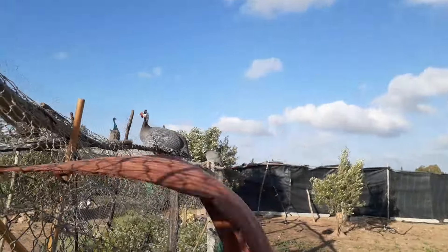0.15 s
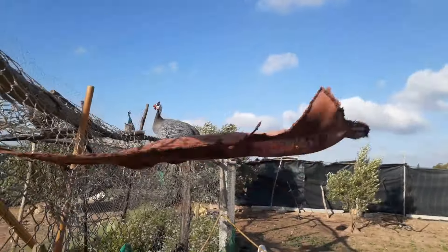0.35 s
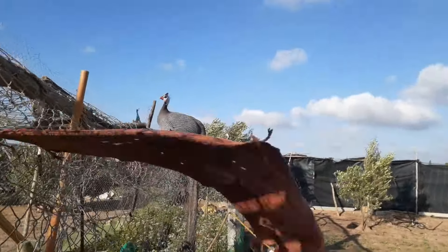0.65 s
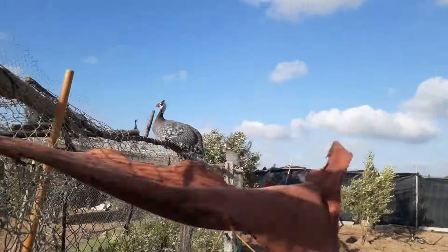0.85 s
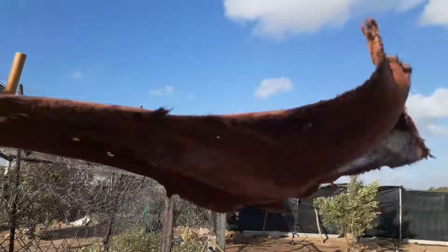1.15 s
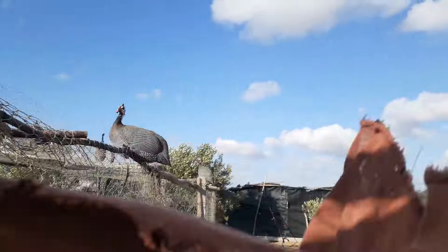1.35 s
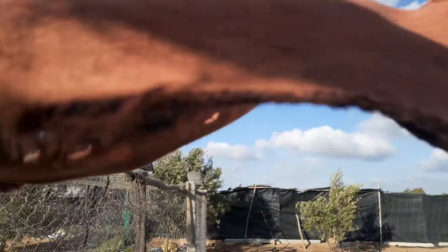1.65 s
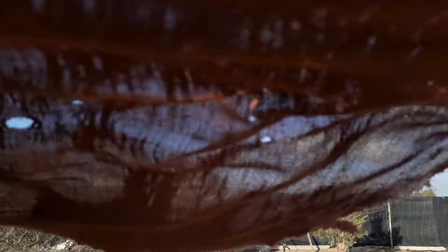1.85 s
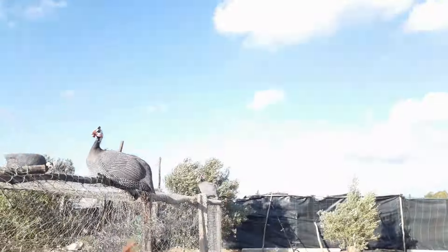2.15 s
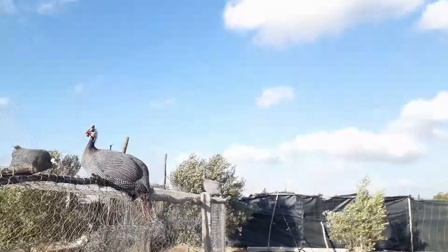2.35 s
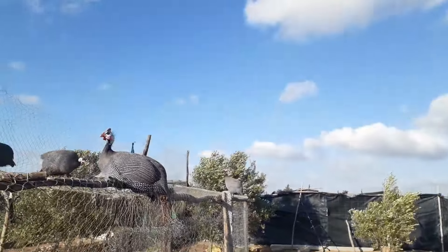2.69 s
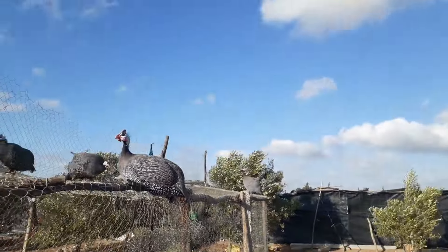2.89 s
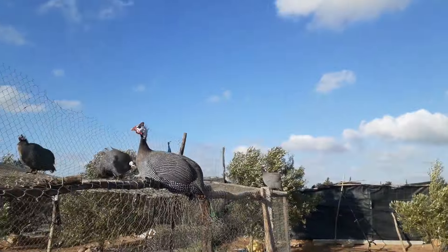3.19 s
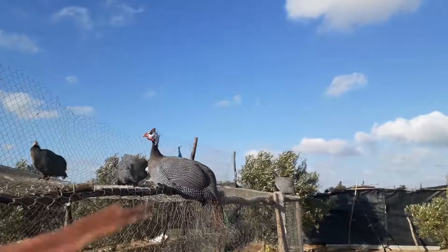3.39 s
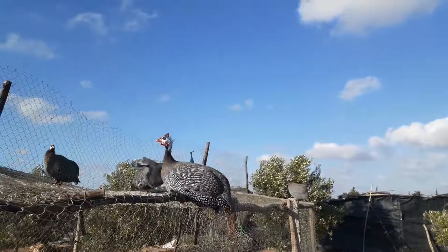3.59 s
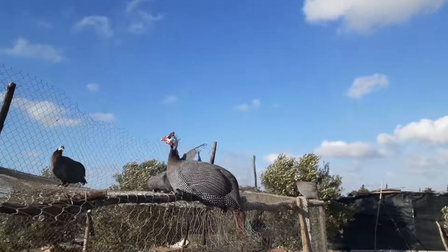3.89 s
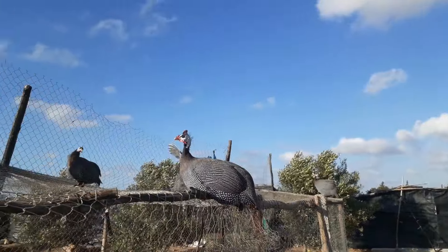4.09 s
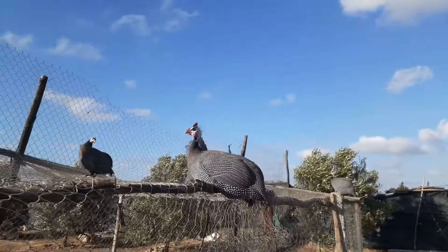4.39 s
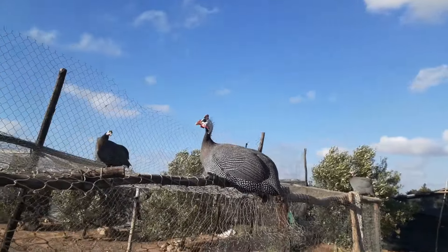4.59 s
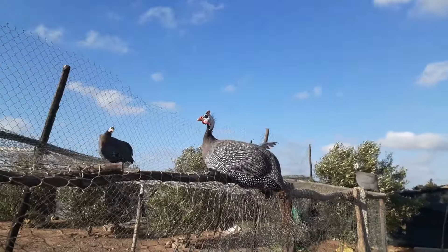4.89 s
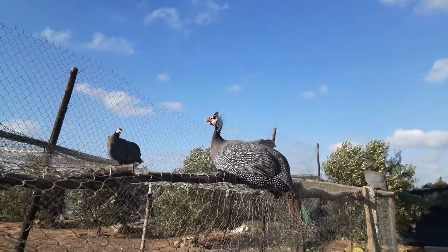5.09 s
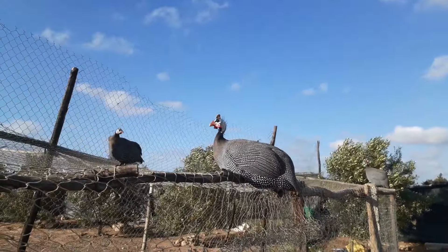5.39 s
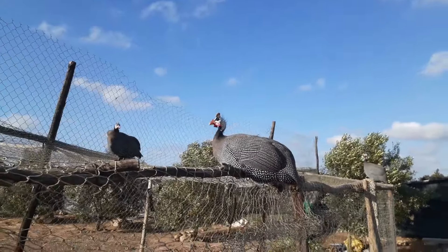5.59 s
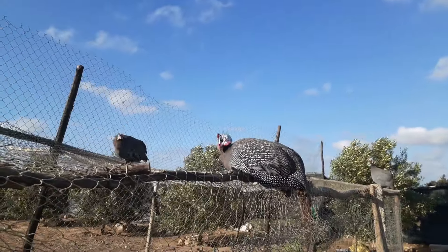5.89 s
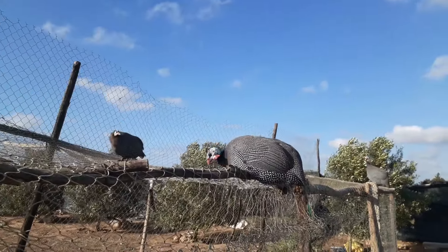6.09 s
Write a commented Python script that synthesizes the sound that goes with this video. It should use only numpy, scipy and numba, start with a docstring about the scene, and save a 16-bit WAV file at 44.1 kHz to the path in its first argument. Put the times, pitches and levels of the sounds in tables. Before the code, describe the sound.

Wind buffets the microphone in uneven gusts and soft thumps while two guineafowl call outdoors by a fence. The closer one repeats short, grating notes several times a second, and the other interjects from the other side. About two seconds in comes a smoother, falling cry, followed by a brief rattle. The harsh notes then resume, mostly shorter and mixed with hoarse squeaks, with slight reflections from the yard.

```python
"""A farm yard: guineafowl on the fence run off fast, harsh notes, a near bird with a second cutting in.
The second gives one long falling cry, then the near one breaks into a rattle. Each note is a buzz of
syrinx pulses through a narrow, sinking throat resonance and a rasping beak resonance; some crack into
a squeak. The yard answers faintly, and gusty wind buffets and thumps both microphone ports."""
import sys
import numpy as np
from scipy import signal
from scipy.fft import rfft, irfft, next_fast_len
from scipy.io import wavfile
from scipy.ndimage import uniform_filter1d, map_coordinates
from numba import njit

SR = 44100
rng = np.random.default_rng(int(sys.argv[2]) if len(sys.argv) > 2 else 0)


def store_wav(level_fs):
    """Save 16-bit WAV to argv[1]."""
    pcm = np.round(np.clip(np.atleast_2d(level_fs), -1, 1) * 32767)
    wavfile.write(sys.argv[1], SR, pcm.T.astype(np.int16))


N = 275625


def amp(db):
    """Decibels to gain."""
    return 10 ** (np.asarray(db) / 20)


def unit(x):
    """Scale to rms 1."""
    return x / np.sqrt(np.mean(x ** 2) + 1e-20)


def steady(x, window_samples=1100):
    """Scale to a running rms of 1."""
    return x / np.sqrt(np.abs(uniform_filter1d(x ** 2, window_samples)) + 1e-12)


def at_hz(points, hz):
    """Interpolate (frequency, value) points on a log frequency axis."""
    knots_hz, values = np.transpose(points)
    return np.interp(np.log(hz + 1), np.log(knots_hz + 1), values)


def wobble(rate_hz, samples=N):
    """Smooth random curve, rate_hz knots a second."""
    knots = rng.standard_normal(int(samples * rate_hz / SR) + 4)
    return map_coordinates(knots, [np.arange(samples) * rate_hz / SR])


def filtered(x, response):
    """Apply a complex frequency response."""
    size = next_fast_len(x.shape[-1] + 4096)
    hz = np.fft.rfftfreq(size, 1 / SR)
    return irfft(rfft(x, size) * response(hz), size)[..., :x.shape[-1]]


def coloured(x, spectrum):
    """Apply (frequency [Hz], gain [dB]) points."""
    return filtered(x, lambda hz: amp(at_hz(spectrum, hz)))


@njit
def resonate(x, hz, width_hz):
    """Resonator with a moving centre."""
    y, state = np.zeros(len(x)), 0j
    for i in range(len(x)):
        state = state * np.exp((-np.pi * width_hz + 2j * np.pi * hz[i]) / SR) + x[i]
        y[i] = state.real
    return y


def impulses(positions, sizes, samples):
    """Band-limited clicks at fractional sample positions."""
    taps = np.floor(positions)[:, None] + np.arange(-7, 9)
    offset = taps - positions[:, None]
    clicks = sizes[:, None] * np.sinc(offset) * np.cos(np.pi * offset / 16) ** 2
    return np.bincount(np.clip(taps, 0, samples - 1).astype(int).ravel(), clicks.ravel(), samples)


def turbulence(spectrum, lump_rate_hz, lump_db):
    """Noise in lumps that differ from port to port, running rms 1."""
    lumps = amp(lump_db * np.array([wobble(lump_rate_hz), wobble(lump_rate_hz)]))
    return steady(coloured(lumps * rng.standard_normal((2, N)), spectrum), window_samples=4400)


# Gust strength (time [s], rumble level [dB], flutter level [dB])
GUSTS = [(0.0, -34, -28), (0.09, -33, -33), (0.12, -27, -22.5), (0.24, -29, -34), (0.29, -32.5, -28),
         (0.35, -36.5, -43), (0.56, -37, -38), (0.57, -41, -23), (0.62, -31, -32.5), (0.87, -28, -28),
         (1.22, -31.5, -28), (1.27, -49, -35), (1.34, -34, -28.5), (1.38, -34, -43), (1.44, -31, -27),
         (1.88, -32.5, -35), (3.25, -32.5, -36.5), (3.43, -63, -60.5), (3.67, -29.5, -31.5),
         (4.02, -44, -52.5), (4.05, -35.5, -37), (4.63, -31, -35), (4.77, -34, -40.5), (5.29, -24, -36),
         (5.33, -27.5, -32), (5.54, -36.5, -41), (5.61, -26.5, -33), (5.79, -33.5, -46),
         (5.94, -31.5, -37.5), (6.25, -35.5, -38.5)]
# Wind and open-air spectra (frequency [Hz], gain [dB])
RUMBLE_SPECTRUM = [(10, -44), (25, -57), (40, -23), (70, -3.5), (150, 2.5), (300, -1), (500, -8.5),
                   (900, -50.5)]
FLUTTER_SPECTRUM = [(150, -4), (350, -1), (600, 0.5), (850, -4.5), (1200, -1.5), (1600, -10.5),
                    (2200, -23.5), (3500, -29), (8000, -46), (16000, -81)]
TEARING_SPECTRUM = [(300, -36), (600, -5.5), (850, 6.5), (1100, -10.5), (1600, -43), (4000, -54)]
AIR_SPECTRUM = [(30, 10), (150, 10), (400, -2), (1000, -21), (3000, -10), (7000, -37), (16000, -55)]


def wind():
    """Gusts rumble and flutter on the ports over quiet air; hard ones tear at a higher pitch."""
    t = np.arange(N) / SR
    time_s, *levels_db = np.transpose(GUSTS)
    rumble_db, flutter_db = (np.interp(t, time_s, db) for db in levels_db)
    swirl_db = 1.63 * np.array([wobble(rate_hz=14), wobble(rate_hz=14)])  # one per port
    hard_gust_db = -29
    tearing_db = hard_gust_db - 4 + 2.08 * (flutter_db + swirl_db - hard_gust_db)
    rumble = amp(rumble_db + 1.5 + swirl_db) * turbulence(RUMBLE_SPECTRUM, lump_rate_hz=49, lump_db=7.5)
    flutter = turbulence(FLUTTER_SPECTRUM, lump_rate_hz=110, lump_db=7)
    flutter *= amp(flutter_db + 4 + 1.85 * swirl_db)
    tearing = amp(tearing_db) * turbulence(TEARING_SPECTRUM, lump_rate_hz=110, lump_db=4.5)
    air = amp(-79) * unit(coloured(rng.standard_normal((2, N)), AIR_SPECTRUM))
    return rumble + flutter + tearing + air


# Squeaks (time [s], length [s], start pitch [Hz], level [dB])
SQUEAK_NOTES = [(0.058, 0.023, 1445, -32.5), (0.262, 0.021, 1355, -33.5), (0.293, 0.0079, 1356, -27),
                (0.921, 0.018, 1345, -29), (0.948, 0.0081, 1314, -19.5), (1.127, 0.0099, 1570, -29),
                (1.264, 0.0093, 1540, -29), (1.298, 0.0058, 1360, -24.5), (1.449, 0.017, 1540, -32),
                (1.632, 0.017, 1424, -27), (1.66, .02, 1460, -30), (2.145, 0.019, 2310, -30),
                (2.234, .025, 1405, -25), (2.333, 0.024, 2370, -29), (2.455, 0.019, 1325, -30),
                (2.477, 0.01, 1303, -18.5), (2.606, 0.017, 1400, -35), (4.373, 0.041, 1488, -25),
                (4.588, 0.014, 1517, -23), (5.292, 0.068, 1630, -26.5), (5.804, 0.046, 1456, -32.5),
                (6.151, 0.027, 1460, -27)]
# Weighting of their harmonics (frequency [Hz], gain [dB])
SQUEAK_SPECTRUM = [(1400, -5), (1520, -51), (1620, 5), (2000, -20), (2850, 14), (3250, -1), (4050, 10),
                   (4700, -5.5), (5400, 5), (6200, -8.5), (8000, -24.5), (11000, -15), (15000, -50)]


def squeaks():
    """The syrinx slips into short, hoarse whistles, all gliding towards one resting pitch."""
    rest_hz, glide_s = 1578, 0.048
    out = np.zeros(N + SR)
    waver = 1 + 0.021 * wobble(rate_hz=600)
    hoarseness = amp(3.4 * wobble(rate_hz=500))
    for time_s, length_s, start_hz, db in SQUEAK_NOTES:
        progress = np.linspace(0, 1, int(length_s * SR))
        start = round(time_s * SR)
        span = slice(start, start + len(progress))
        hz = (rest_hz + (start_hz - rest_hz) * np.exp(-progress * length_s / glide_s)) * waver[span]
        phase = 2 * np.pi * np.cumsum(hz) / SR
        tone = sum(amp(at_hz(SQUEAK_SPECTRUM, k * hz)) * np.sin(k * phase) for k in range(1, 9))
        envelope = np.sqrt(np.abs(np.sin(np.pi * progress ** (2 / 3))))
        out[span] += amp(db) * unit(tone * hoarseness[span] * envelope)
    return out[:N]


# Port mismatch (frequency [Hz], left minus right [dB])
PORT_BALANCE = [(2100, 0), (4500, -4.5), (7000, -0.5), (12000, 2)]
# Yard reverberation (frequency [Hz], T60 [s])
YARD_DECAY = [(300, 0.45), (2000, 0.34), (4600, 0.39), (7000, 0.36), (14000, 0.41)]
# Echo colour (frequency [Hz], gain [dB])
ECHO_SPECTRUM = [(2000, 2), (4600, -1.5), (7000, -1.5), (14000, 5)]


def yard(x, left_lead_s, pan_db, walls_db, tail_db):
    """Direct sound at both ports, plus echoes and a diffuse tail off fence, ground and sheds."""
    def ports(hz):
        side = np.array([[1], [-1]])
        gain = amp(side * (pan_db + at_hz(PORT_BALANCE, hz)) / 2)
        return gain * np.exp(1j * np.pi * hz * left_lead_s * side)

    samples = SR // 2
    walls = np.zeros((2, samples))
    for channel in walls:
        signs = rng.choice([-1, 1], size=10)
        delays_s = rng.uniform(0.002, 0.02, size=10)
        channel[(delays_s * SR).astype(int)] = signs
    hz, t, noise = signal.stft(rng.standard_normal((2, samples)), SR, nperseg=256)
    decay = amp(-60 * t / at_hz(YARD_DECAY, hz)[:, None])
    tail = signal.istft(noise * decay, SR, nperseg=256)[1][:, :samples]
    response = amp(walls_db) * walls / np.linalg.norm(walls[0])
    response += amp(tail_db) * tail / np.linalg.norm(tail[0])
    echoes = signal.fftconvolve(coloured(x, ECHO_SPECTRUM)[None], response, axes=1)[:, :N]
    return filtered(x, ports) + echoes


def syrinx(pulse_hz, flutter_phase, roughness):
    """Pulses, pulled early and late by the slower flutter, with a puff of air in each."""
    n = np.arange(len(pulse_hz))
    cycles = np.cumsum(pulse_hz) / SR
    positions = np.interp(np.arange(1, int(cycles[-1]) + 1), cycles, n)
    slip, scatter = rng.standard_normal((len(positions), 2)).T
    jitter_s = 80e-6 * roughness * slip + 35e-6 * np.sin(np.interp(positions, n, flutter_phase))
    pulses = impulses(positions + SR * jitter_s, amp(4 * roughness * scatter), len(n))
    puffs = rng.standard_normal(len(n)) * np.exp(0.49 * np.cos(2 * np.pi * cycles))
    return unit(pulses) + 3.47 * roughness * unit(puffs)


# Overtones that move with the beak resonance (multiple [ratio], width [Hz], level [dB])
BEAK_MODES = [(1.47, 700, -17.5), (2.45, 1310, -27)]
# Rasp treble by note onset (time [s], gain [dB])
RASP_TREBLE = [(0.6, -9.5), (0.75, -1), (1.0, -0.5), (2.3, -2.5), (2.8, 9.5), (3.2, -1), (3.9, -1),
               (4.2, -2), (4.68, 10.5), (4.82, -2), (5.4, 1.5), (5.9, -6)]
# Share of that gain applied (frequency [Hz], share [0-1])
TREBLE_SHARE = [(6500, 0), (10000, 1)]


def beak_rasp(source, time_s, centre_hz, nominal_hz, width_hz, spectrum, upper_db):
    """Pulses ring the moving beak modes and fixed upper resonances whose levels vary by note."""
    treble_db = np.interp(time_s, *np.transpose(RASP_TREBLE))
    modes = 0
    for multiple, mode_width_hz, db in [(0.98, width_hz, 0), *BEAK_MODES]:
        ring = resonate(source, multiple * centre_hz, mode_width_hz)
        ring = resonate(ring, multiple * centre_hz, mode_width_hz)
        modes += amp(db + treble_db * at_hz(TREBLE_SHARE, multiple * nominal_hz)) * unit(ring)
    hz, gain_db = np.transpose(spectrum)
    colour_db = treble_db * at_hz(TREBLE_SHARE, hz) + 2.5 * rng.standard_normal(len(hz))
    upper = coloured(source, np.column_stack([hz, gain_db + colour_db]))
    return steady(unit(modes) + amp(upper_db) * unit(upper), window_samples=2200)


# Fixed colour of the honk (frequency [Hz], gain [dB])
CHEST_SPECTRUM = [(300, -45), (1000, -22), (1450, -4), (2100, 0), (2900, -6), (3500, -11), (5000, -35),
                  (9000, -70)]


def guineafowl(notes, beak_spectrum, roughness_curve, *, throat_width_hz, beak_hz, beak_width_hz,
               chest_db, upper_db, flutter_hz, flutter_drift, flutter_depth,
               rise_s, fade_db, sink_hz_per_s, sink_s, pitch_follow):
    """The syrinx rings the throat (honk) and, chopped by its flutter, the beak (rasp)."""
    build_s, hold_s, max_fade_s, close_s = 0.01598, 0.026, 0.064, 0.028
    beak_hz_per_db = 17  # a harder rasp opens the beak wider
    out = np.zeros(N + SR)
    for time_s, length_s, db, rasp_db, pulse_hz, throat_hz in notes:
        t = np.arange(int(length_s * SR)) / SR
        roughness = at_hz(roughness_curve, pulse_hz)
        # Pitch and rasp sag while pressure builds and as it runs out.
        building = np.exp(-t / build_s)
        spent = np.clip(1 - (length_s - t) / min(0.554 * length_s, max_fade_s), 0, 1)
        sag = 0.07527 * (building + 1.125 * spent ** 1.178)
        sunk_hz = sink_hz_per_s * np.maximum(t - max(hold_s, length_s - sink_s), 0)

        drifting_hz = flutter_hz * (1 + flutter_drift * wobble(41.2, len(t)))
        flutter_phase = 2 * np.pi * np.cumsum(drifting_hz) / SR
        bend = 0.005 * wobble(30, len(t)) - sag - pitch_follow * sunk_hz / throat_hz
        pulses = syrinx(pulse_hz * (1 + bend), flutter_phase, roughness)
        chopped = pulses * (1 - flutter_depth * np.sin(flutter_phase / 2) ** 2)

        throat = resonate(coloured(pulses, CHEST_SPECTRUM), throat_hz - sunk_hz, throat_width_hz)
        chest = amp(chest_db + 10 * roughness) * unit(coloured(chopped, CHEST_SPECTRUM))
        honk = steady(steady(throat) + chest)

        opening = 1 - 0.095 * building - 0.027 * spent
        centre_hz = (beak_hz + beak_hz_per_db * rasp_db) * opening - 0.61 * sunk_hz
        rasp = beak_rasp(chopped, time_s, centre_hz, beak_hz, beak_width_hz, beak_spectrum,
                         upper_db + 1.2 * roughness)
        rasp *= amp(rasp_db + 3 - 0.5 * building - 8 * spent)

        attack = np.sin(np.pi / 2 * np.minimum(t / rise_s, 1)) ** 1.17
        release = np.minimum((length_s - t) / close_s, 1)
        tremor_db = 1.2 * wobble(110, len(t))
        gain = amp(db - fade_db * spent ** 1.44 + tremor_db)
        out[round(time_s * SR):][:len(t)] += attack * release * gain * (honk + rasp)
    return out[:N]


# Near notes (time [s], length [s], level [dB], rasp strength [dB], pulse rate [Hz], throat [Hz])
NEAR_CALLS = [ (0.066, 0.067, -23, -2.5, 359.3, 2190), (0.18, 0.067, -26.5, -1.5, 359.6, 2140),
              (0.295, 0.062, -26.5, 0, 346.3, 2120), (0.419, 0.076, -24, 1, 371.6, 2080),
              (0.556, 0.098, -25, 3, 370, 2050), (0.733, 0.12, -23.5, 2.5, 383, 1990),
              (0.987, .15, -22.5, 4, 383.3, 2040), (1.09, .24, -28, 4.5, 364, 1870),
              (1.448, 0.12, -23.5, 2.5, 382, 2080), (1.903, .11, -23, 3.5, 375, 2090),
              (2.152, .052, -22.5, -3, 338, 1960), (2.34, 0.057, -25, -9.5, 327, 1920),
              (2.527, 0.06, -25, -4.5, 354.6, 2180), (2.998, 0.057, -20, -1.5, 366.7, 2160),
              (3.098, 0.063, -22.5, 1.5, 371.4, 2170), (3.208, .06, -22.5, 4, 373.3, 2090),
              (3.374, 0.098, -22.5, 3.5, 385, 2020), (3.614, 0.13, -24.5, 1.5, 370.2, 2213),
              (3.868, 0.11, -22.5, -0.5, 364.4, 2200), (4.186, 0.066, -21.5, -5.5, 344.6, 2096),
              (4.398, 0.046, -25, -8, 345.6, 2150), (4.482, 0.063, -23, -7, 325.7, 2300),
              (4.59, 0.053, -22.5, -2, 331, 2030), (4.683, .062, -19.5, -5, 330, 2190),
              (4.786, 0.065, -19, -2, 363, 2240), (4.902, 0.067, -19, -2.5, 360.7, 2205),
              (5.048, 0.083, -19.5, -2.5, 345.3, 2120), (5.58, 0.11, -25.5, -6, 346.5, 2020),
              (5.814, 0.071, -20, -1.5, 373, 2170), (5.978, 0.07, -24.5, -7, 342, 2100),
              (6.157, 0.055, -18.5, -3.5, 375.8, 2250)]
# Upper beak resonances, also for cry and rattle (frequency [Hz], gain [dB])
BEAK_SPECTRUM = [(1500, -84), (3000, -3), (3900, 3.5), (5000, -27), (5600, 6.5), (6700, -3), (7400, -8.5),
                 (8200, -9), (9600, -11.5), (11300, -12), (13500, -21), (16000, -30)]
# A slack, slow syrinx beats more roughly (pulse rate [Hz], roughness [0-1])
NEAR_ROUGHNESS = [(325, .6), (345, .38), (365, .21), (385, .13)]


def near_bird():
    """A fast run of harsh notes through a very narrow throat resonance."""
    return guineafowl(NEAR_CALLS, BEAK_SPECTRUM, NEAR_ROUGHNESS,
                      throat_width_hz=100, beak_hz=4663, beak_width_hz=900, chest_db=-4.5, upper_db=-6,
                      flutter_hz=76.65, flutter_drift=0.11, flutter_depth=0.48,
                      rise_s=0.012, fade_db=22, sink_hz_per_s=5260, sink_s=0.11, pitch_follow=0.145)


# Eddies (time [s], level [dB], frequency [Hz], left minus right [dB])
EDDIES = [(0.104, -11, 895, -0.5), (0.565, -12.5, 735, -3), (1.332, -21, 265, -4.5),
          (1.45, -9.5, 815, -1.0), (2.137, -12.5, 1210, -1.0), (3.562, -20.5, 513, 1),
          (4.971, -18, 1120, 11), (5.076, -14, 1100, 14), (5.331, -13.5, 135, 4), (5.392, -17.5, 105, -2),
          (5.445, -14, 920, -8), (6.109, -17, 690, -3)]


def eddy_thumps(rise_cycles, gain_db):
    """Single eddies give the ports a short, heavily damped push."""
    out = np.zeros((2, N + SR))
    t = np.arange(SR // 10) / SR
    for time_s, db, hz, pan_db in EDDIES:
        age = hz * t / rise_cycles
        push = np.sin(2 * np.pi * hz * t) * (age * np.exp(1 - age)) ** 2
        port_gains = amp(db + gain_db + np.array([[pan_db], [-pan_db]]) / 2)
        out[:, round(time_s * SR):][:, :len(t)] += port_gains * push
    return out[:, :N]


# Second bird (time [s], length [s], level [dB], rasp strength [dB], pulse rate [Hz], throat [Hz])
SECOND_CALLS = [ (0.288, 0.023, -20.5, -4, 351, 3100), (0.465, 0.049, -35.5, -3, 349, 2630),
                (0.915, 0.087, -31, -3, 357, 2640), (1.16, 0.16, -33, -8, 365, 2230),
                (1.28, 0.061, -26, -1, 375.4, 2240), (1.626, .13, -30, -0.5, 357, 2780),
                (2.236, 0.05, -23.5, -4.5, 351, 2830), (2.45, 0.066, -26.5, -5, 347.3, 2920),
                (4.162, 0.035, -29.5, -7, 341, 2960), (5.284, 0.044, -24, -8.5, 387.6, 2450),
                (5.39, 0.069, -21, -5, 417, 2410)]
# Its upper beak resonances (frequency [Hz], gain [dB])
SECOND_BEAK_SPECTRUM = [(1500, -44), (2800, -17), (3400, 9.5), (4050, 5), (5300, 4), (6000, 7), (6800, -2),
                        (8400, -15.5), (11500, -13.5), (16000, -24)]
# Its syrinx (pulse rate [Hz], roughness [0-1])
SECOND_ROUGHNESS = [(337, .18), (355, .45), (400, .28)]


def second_bird():
    """Scattered notes with a higher throat resonance and a broader rasp."""
    return guineafowl(SECOND_CALLS, SECOND_BEAK_SPECTRUM, SECOND_ROUGHNESS,
                      throat_width_hz=160, beak_hz=4750, beak_width_hz=1800, chest_db=-5, upper_db=3.5,
                      flutter_hz=43, flutter_drift=0.16, flutter_depth=0.61,
                      rise_s=0.0082, fade_db=8, sink_hz_per_s=6200, sink_s=0.24, pitch_follow=0.3)


# Cry (time [s], length [s], level [dB], rasp strength [dB], pulse rate [Hz], throat [Hz])
CRY_CALL = [(1.75, 0.36, -29.5, 1, 340.7, 2182)]
# Syrinx in the cry (pulse rate [Hz], roughness [0-1])
CRY_ROUGHNESS = [(340, .1)]


def falling_cry():
    """One long, smoother note; the pitch follows the sinking throat down."""
    return guineafowl(CRY_CALL, BEAK_SPECTRUM, CRY_ROUGHNESS,
                      throat_width_hz=150, beak_hz=4490, beak_width_hz=1350, chest_db=-3, upper_db=-5.5,
                      flutter_hz=110.5, flutter_drift=0.042, flutter_depth=0.43,
                      rise_s=0.02, fade_db=16, sink_hz_per_s=2000, sink_s=0.32, pitch_follow=0.52)


# Rattle (time [s], length [s], level [dB], rasp strength [dB], pulse rate [Hz], throat [Hz])
RATTLE_CALL = [(2.629, 0.35, -26.5, -2.7, 353.3, 1780)]


def rattle():
    """One drawn-out note, choked by a slow, deep, regular flutter."""
    return guineafowl(RATTLE_CALL, BEAK_SPECTRUM, NEAR_ROUGHNESS,
                      throat_width_hz=200, beak_hz=4610, beak_width_hz=1350, chest_db=-4.5, upper_db=-8,
                      flutter_hz=39, flutter_drift=0.013, flutter_depth=0.88,
                      rise_s=0.0055, fade_db=10, sink_hz_per_s=240, sink_s=0.3, pitch_follow=0.4)


def scene():
    """Two birds in the yard, wind on the ports."""
    near = near_bird() + rattle()
    second = second_bird() + falling_cry()
    birds = yard(near, left_lead_s=425.7e-6, pan_db=0, walls_db=-4, tail_db=-16.5)
    birds += yard(second, left_lead_s=-267e-6, pan_db=1.7, walls_db=1, tail_db=-16)
    birds += yard(squeaks(), left_lead_s=30e-6, pan_db=-0.5, walls_db=-13, tail_db=-12)
    return birds + wind() + eddy_thumps(rise_cycles=0.92, gain_db=-2.5)


def record(dry):
    """The loudest peaks are softly rounded off, the deepest bass thinned and the top treble cut."""
    ceiling, low_cut_hz, top_hz = 0.85, 42, 16100
    rounded = dry / (1 + np.abs(dry / ceiling) ** 4) ** 0.25
    return filtered(rounded, lambda hz: (hz < top_hz) * hz ** 2 / np.sqrt(hz ** 4 + low_cut_hz ** 4))


dry = scene()
out = record(dry)
store_wav(out)
```